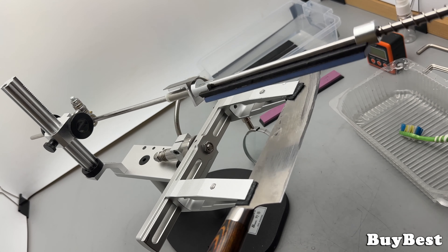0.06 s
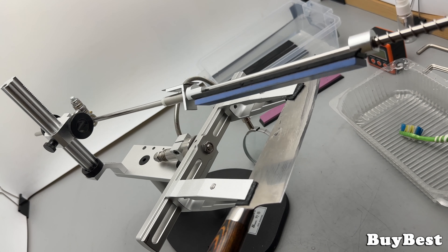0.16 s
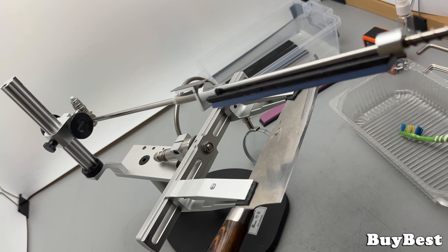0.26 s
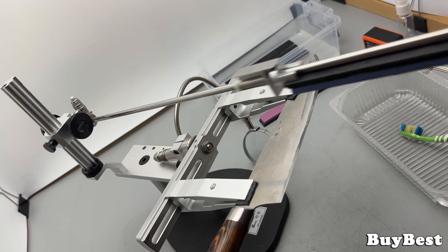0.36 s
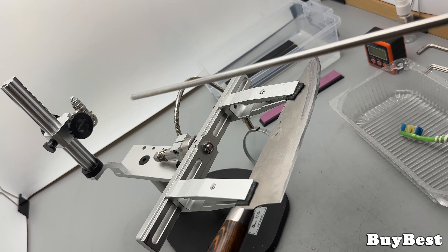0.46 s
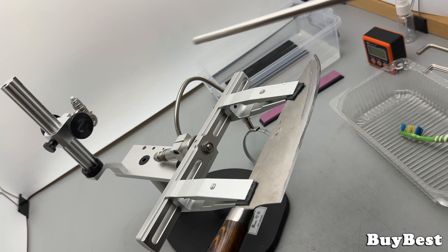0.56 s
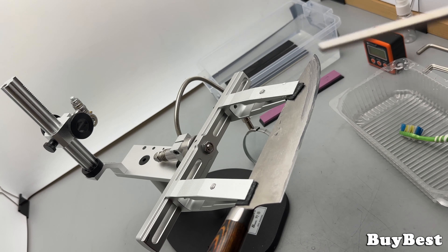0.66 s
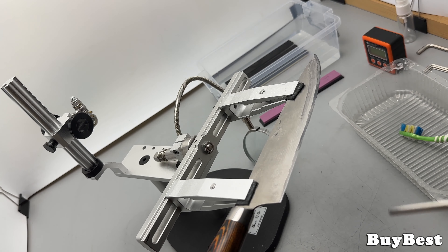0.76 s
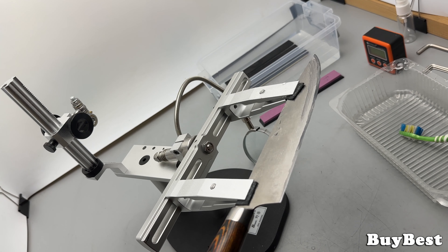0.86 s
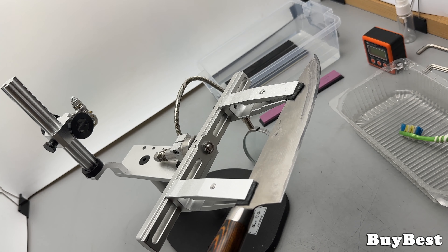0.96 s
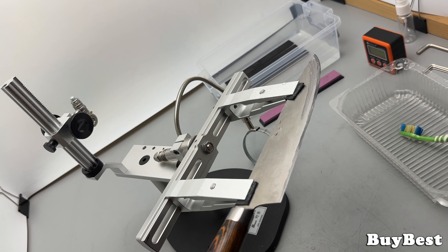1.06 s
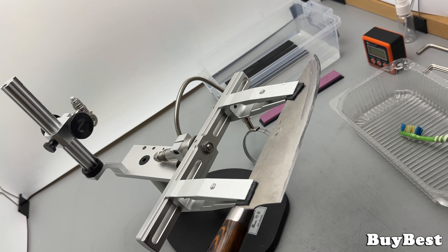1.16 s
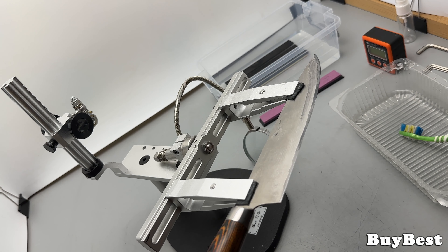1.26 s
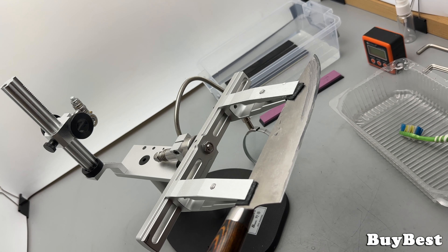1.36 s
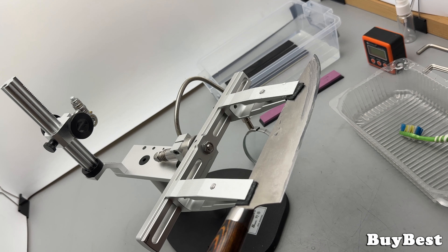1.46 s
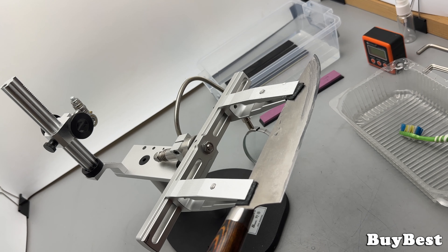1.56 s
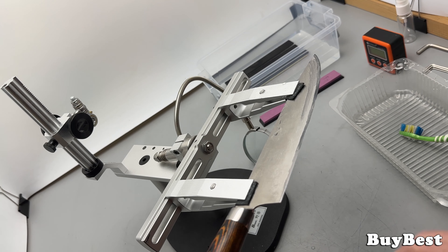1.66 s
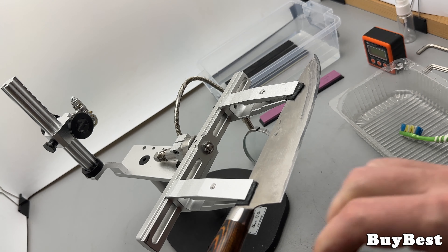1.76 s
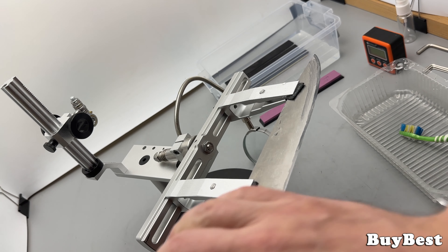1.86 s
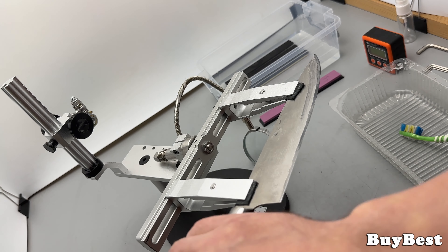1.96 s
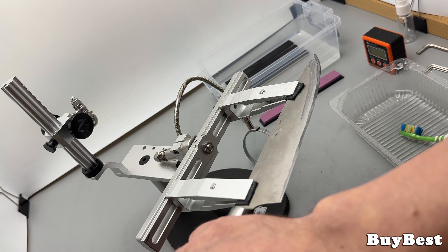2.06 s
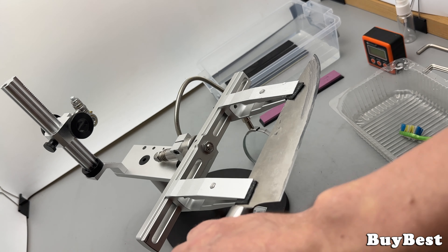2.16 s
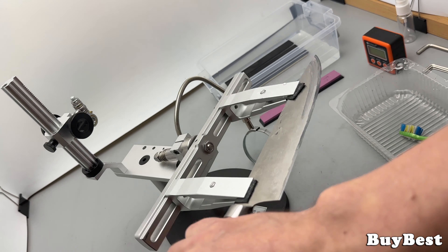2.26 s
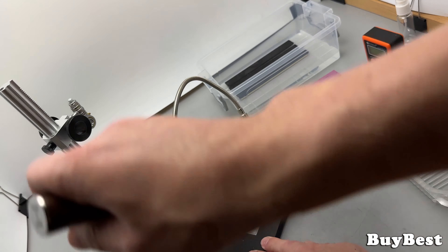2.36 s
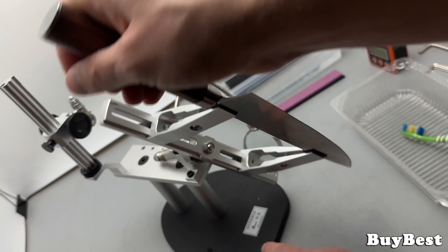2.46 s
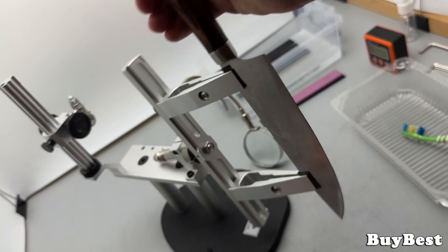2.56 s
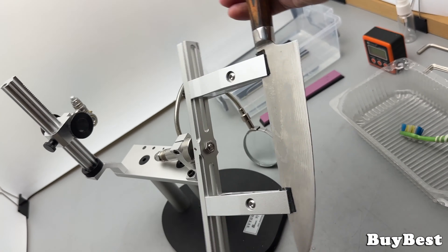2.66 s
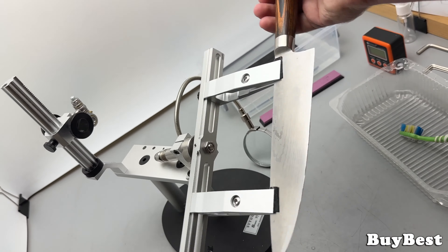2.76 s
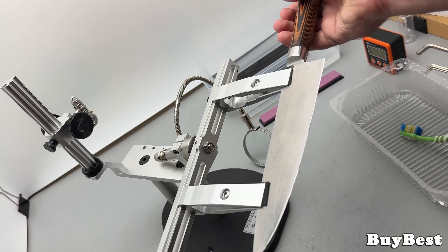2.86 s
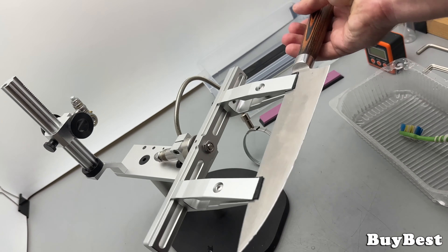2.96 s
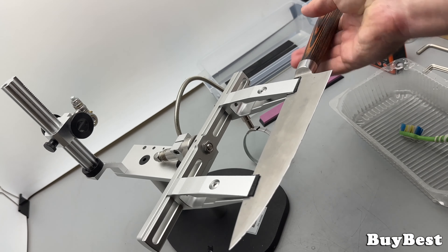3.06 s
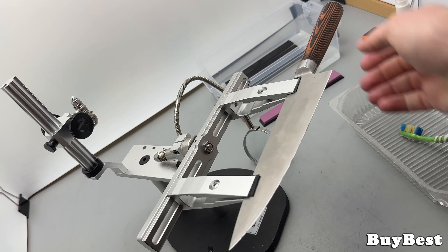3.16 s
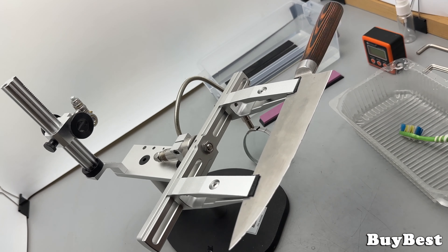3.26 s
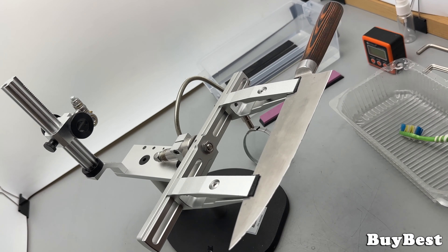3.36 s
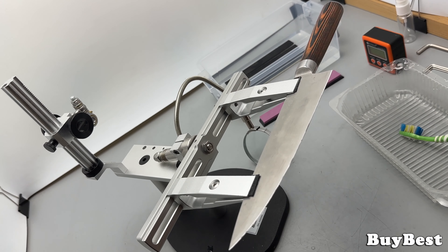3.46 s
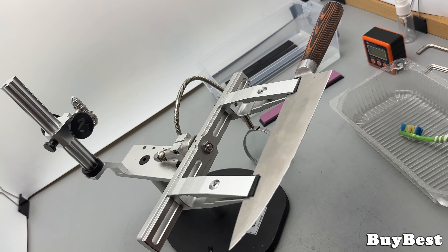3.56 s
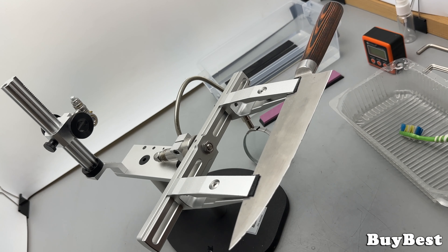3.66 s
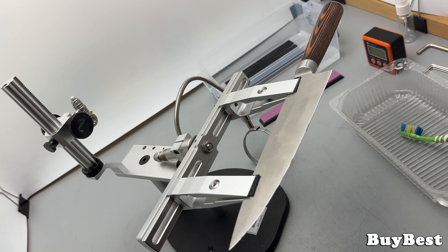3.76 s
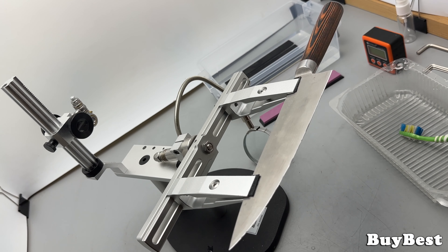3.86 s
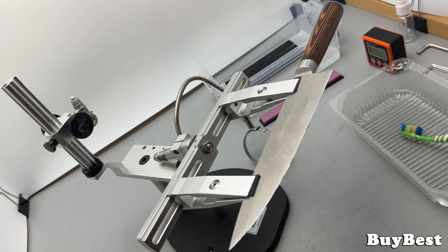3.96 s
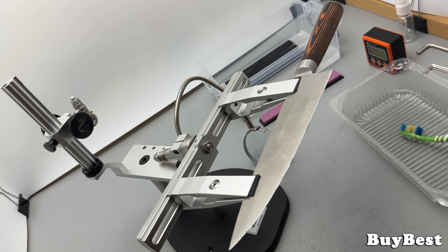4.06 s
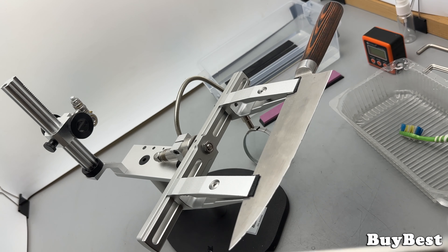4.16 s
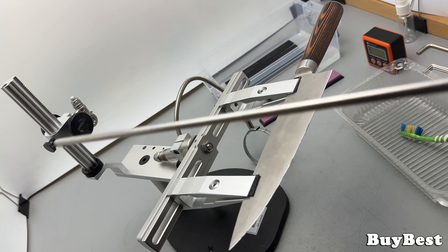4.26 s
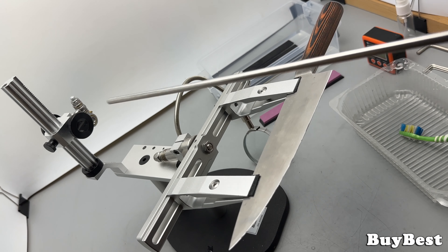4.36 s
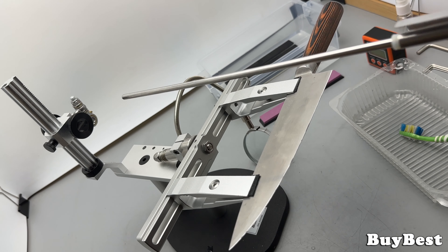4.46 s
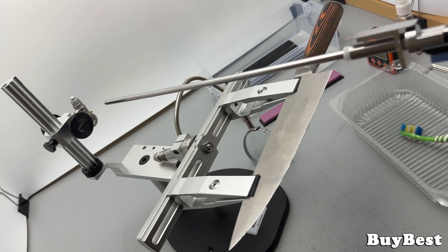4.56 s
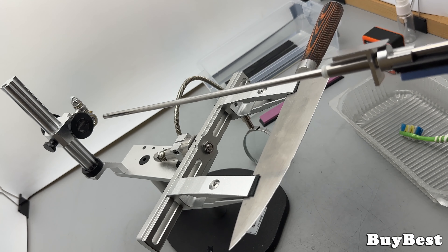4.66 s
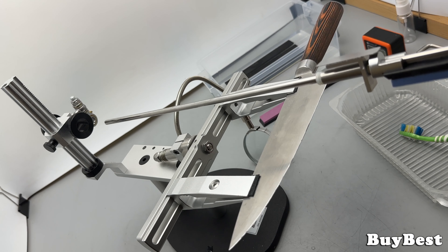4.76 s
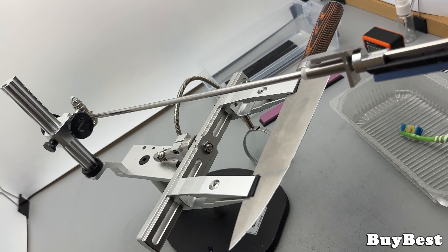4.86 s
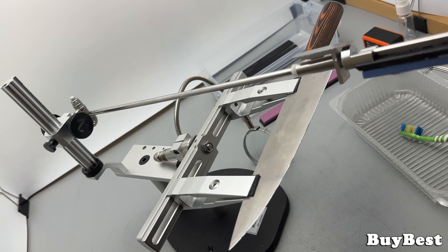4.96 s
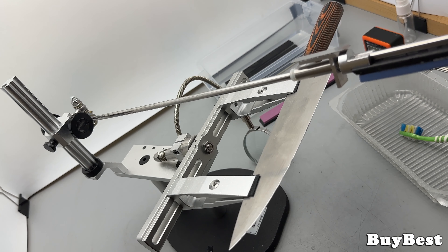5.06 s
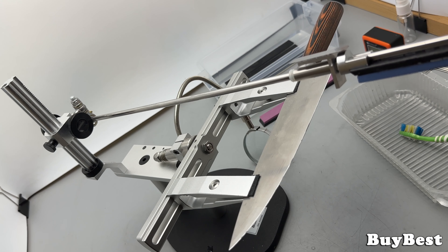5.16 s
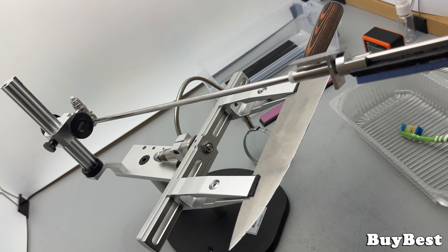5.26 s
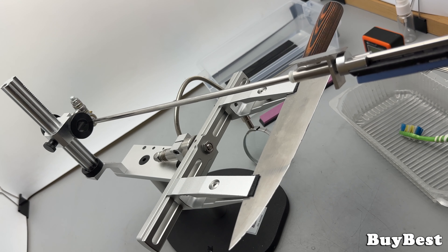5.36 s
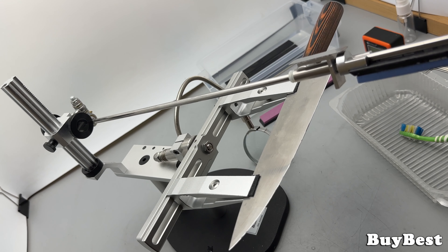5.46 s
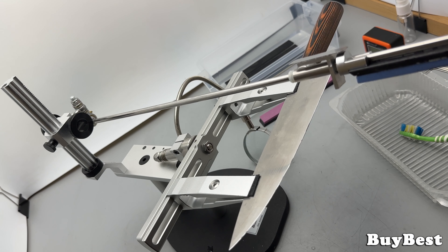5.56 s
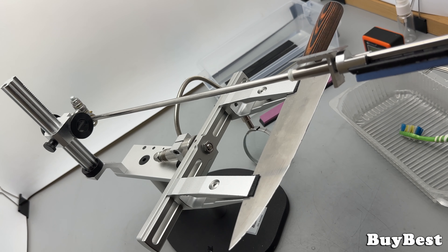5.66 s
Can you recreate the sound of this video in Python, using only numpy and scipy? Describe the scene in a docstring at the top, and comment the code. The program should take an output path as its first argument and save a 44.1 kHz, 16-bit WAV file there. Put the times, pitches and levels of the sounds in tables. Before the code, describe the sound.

In a small quiet room, metallic scrapes, a sinking gritty slide, two bursts of latch clacks with low thuds, then fine clinks and ticks.

```python
"""A steel rod rasps out of its guide in short pulls, over a faint rumble; then it slides away, slowing to a stop.
A guided knife sharpener on a workbench: a hand takes the knife, its clamp is unlatched, turned on a dry pivot
and snaps home, shaking the stand. Things rub and tick on the bench, and the rod clinks back into the guide.
Friction is roughened noise through resonances; impacts are noise bursts with decaying modes; the stand rocks
in decaying sines. A small, quiet room answers with a decaying noise tail."""
import sys
import numpy as np
from scipy import signal
from scipy.fft import rfft, irfft, next_fast_len
from scipy.io import wavfile
from scipy.ndimage import uniform_filter1d, map_coordinates

SR = 44100
rng = np.random.default_rng(int(sys.argv[2]) if len(sys.argv) > 2 else 0)


def wav_record(signal):
    """Record a signal, one row per channel, as 16-bit PCM in the file named by sys.argv[1]."""
    frames = np.transpose(np.atleast_2d(signal))
    bounded = np.clip(frames, -1, 1)
    # unit amplitude maps onto the largest positive 16-bit level
    quanta = np.round(bounded * 32767).astype(np.int16)
    wavfile.write(sys.argv[1], SR, quanta)


N = 251811  # length in samples

# Decibels in the tables are relative; each source's own gains follow. Every t60 is the time to fall by 60 dB.


def amp(db):
    """Decibels to gain: 20 dB is a factor of ten in amplitude."""
    return 10 ** (np.asarray(db) / 20)


def unit(x):
    """Scale to a root mean square of 1."""
    return x / np.sqrt(np.mean(x ** 2) + 1e-20)


def along(points, hz):
    """Interpolate (frequency, value) points on a logarithmic frequency axis."""
    f, v = np.transpose(points)
    return np.interp(np.log(hz + 1), np.log(f + 1), v)


def since(s):
    """Seconds since time s for each sample, zero before it."""
    return np.maximum(np.arange(N) / SR - s, 0)


STROKE_EDGE_S = 0.005  # a movement sets in and stops this fast


def level(rows, swell_db, ease_db):
    """Envelope of a set of movements: each sets in, swells to its peak, eases off and stops."""
    t, gain = np.arange(N) / SR, np.zeros(N)
    for s, rise, fall, db in rows:
        swelling = swell_db * (s + rise - t) / rise
        easing = ease_db * (t - s - rise) / fall
        under_peak_db = np.maximum(swelling, easing)
        to_nearest_end = np.minimum(t - s, s + rise + fall - t)
        moving = np.clip(to_nearest_end / STROKE_EDGE_S + 0.5, 0, 1)
        gain += moving * amp(db - under_peak_db)
    return gain


def wobble(rate):
    """A smooth random curve: a spline through random knots, rate of them a second."""
    knots = rng.standard_normal(int(N * rate / SR) + 4)
    return map_coordinates(knots, [np.arange(N) * rate / SR])


def filtered(x, response):
    """Linear filtering: multiply the spectrum by a response of frequency."""
    n = x.shape[-1]
    m = next_fast_len(n + SR // 10)
    return irfft(rfft(x, m) * response(np.fft.rfftfreq(m, 1 / SR)), m)[..., :n]


# Likeness of the left and right channels (1 = identical, negative = opposed).
# columns: frequency_hz, likeness
LIKENESS = [(150, 0.96), (400, 0.48), (1200, 0.12), (3200, 0.22), (6500, -0.14), (11000, 0.61)]


def channel_angle(hz):
    """Channel correlation as a phase angle in radians: its cosine is the likeness."""
    return np.arccos(np.clip(along(LIKENESS, hz), -1, 1))


def noise(colour_db, size=N):
    """Partly correlated stereo noise of rms 1, nearly mono in the bass, from a mid and a side signal."""
    def mid_and_side(hz):
        half = channel_angle(hz) / 2
        return amp(colour_db(hz)) * [np.cos(half), np.sin(half)]

    mid, side = filtered(rng.standard_normal((2, size)), mid_and_side)
    return unit(np.array([mid + side, mid - side]))


def add(track, s, sound):
    """Superposition: mix a sound in at time s."""
    part = track[:, round(s * SR):][:, :sound.shape[-1]]
    part += sound[..., :part.shape[-1]]


def ripple(hz, spacing_hz):
    """Modal density: the fixed, close peaks and dips in the response of a body of many parts."""
    return map_coordinates(rng.standard_normal(size=2048), [hz / spacing_hz], mode="wrap")


def friction(spectrum, rough_db, catch_rate, peaks=(), ring_db=0, ripple_db=2.5):
    """Sliding friction: tiny catches between two surfaces, heard through the body's resonances."""
    def body(hz):
        power = 1
        for centre, width, db in peaks:
            power = power + amp(ring_db + db) ** 2 / (1 + (2 * (hz - centre) / width) ** 2)
        return np.sqrt(power) * amp(ripple_db * ripple(hz, spacing_hz=54.88))

    catches = noise(lambda hz: along(spectrum, hz)) * amp(rough_db * wobble(catch_rate))
    return unit(filtered(catches, body))


def patchy(x, depth_db):
    """Moving excitation: as the contact travels, it stirs now one group of resonances, now another."""
    z = signal.stft(x, nperseg=512)[2]
    field = rng.standard_normal(z.shape[1:])
    field = uniform_filter1d(field, size=4, axis=0)  # smooth over frequency
    field = uniform_filter1d(field, size=9, axis=1)  # smooth over time
    return unit(signal.istft(z * amp(depth_db * unit(field)), nperseg=512)[1][:, :N])


def strikes(rows, spectrum, modes, crunch_db, ring_db):
    """Impact excitation: each contact is a short crunch that leaves the body's modes ringing at new strengths."""
    out, t = np.zeros((2, N)), np.arange(SR // 2) / SR
    for s, db, tilt_db, rise, t60 in rows:
        def tilt(hz):
            return tilt_db * np.log2(np.maximum(hz, 200) / 1000)  # constant below 200 Hz

        crunch = noise(lambda hz: along(spectrum, hz) + tilt(hz), size=len(t))
        sound = amp(crunch_db - 60 * t / t60) * crunch
        weight = np.linalg.norm([amp(mode_db + tilt(hz)) for hz, mode_db, _ in modes])
        for hz, mode_db, life in modes:
            phase = rng.uniform(0, 2 * np.pi) + np.array([[0], [channel_angle(hz)]])
            mode_level = ring_db + mode_db + tilt(hz) + rng.normal(0, 0.42)
            sound += amp(mode_level - 60 * t / life) / weight * np.sin(2 * np.pi * hz * t + phase)
        add(out, s, amp(db) * sound * (1 - np.exp(-t / rise)))
    return out


# Swells of low rumble. columns: start_s, rise_s, fall_s, level_db
RUMBLE_SWELLS = [(0.0, 0.033, 0.34, -62.5), (0.68, 0.13, 0.16, -61), (0.97, 0.5, 0.13, -60),
                 (1.5, 0.18, 0.3, -54.5), (2.3, 0.51, 0.66, -55.5), (3.5, 0.16, 0.11, -57.5),
                 (3.95, 0.26, .6, -63), (5.6, 0.09, .1, -62.5)]
# Spectra of the rumble and of the hiss. columns: frequency_hz, level_db
RUMBLE_SPECTRUM = [(12, -48), (20, -22.5), (43, -1), (65, -1.5), (119, -3), (170, -12), (204, -15),
                   (512, -29), (700, -40), (910, -70.5), (1540, -120)]
HISS_SPECTRUM = [(120, -32), (200, -6.5), (310, -17), (340, -16.5), (577, -21.5), (681, -25.5), (896, -24),
                 (981, -26.5), (2940, -30), (3590, -30.5), (15800, -44.5)]
RUMBLE_DB = -71  # the steady rumble under the swells, on their scale
SHUDDER_DB, SHUDDER_T60_S = -24.5, 0.28  # the pitchless shudder, relative to its jolt


def background():
    """Incoherent sources add in power: rumble, its swells and a shudder after each jolt, with even hiss."""
    shudder = np.zeros(N)
    for s, db, _ in JOLTS:
        after = since(s)
        shudder += amp(db + SHUDDER_DB - 60 * after / SHUDDER_T60_S) * (after > 0)
    swells = level(RUMBLE_SWELLS, swell_db=11, ease_db=14)
    gain = np.sqrt(amp(RUMBLE_DB) ** 2 + swells ** 2 + shudder ** 2)
    rumble = amp(0.5) * gain * noise(lambda hz: along(RUMBLE_SPECTRUM, hz))
    hiss = amp(-76.5) * noise(lambda hz: along(HISS_SPECTRUM, hz))
    return rumble + hiss


# Pulls that draw the rod through its guide. columns: start_s, length_s, starting_level_db
ROD_PULLS = [(0.0, 0.0071, -67), (0.025, 0.12, -85), (0.131, 0.035, -64), (0.218, 0.201, -63)]
PULL_ATTACK_S, PULL_GROWS_DB_PER_S = 0.0067, 58  # the rod gathers speed through a pull
PULL_STOP_S, GUIDE_AFTER_DB, GUIDE_T60_S = 0.049, -13, 0.22  # t60 of the stop; level and t60 of the guide's ring


def pulls():
    """Envelope of accelerated sliding: each pull grows louder, stops short and lets the guide ring on."""
    gain = np.zeros(N)
    for s, length, db in ROD_PULLS:
        t, after = since(s), since(s + length)
        stop = amp(-60 * after / PULL_STOP_S)
        guide_ring = amp(GUIDE_AFTER_DB - 60 * after / GUIDE_T60_S)
        growing = amp(db + PULL_GROWS_DB_PER_S * (t - after))
        gain += (1 - np.exp(-t / PULL_ATTACK_S)) * growing * np.maximum(stop, guide_ring)
    return gain


# The rod's tip snags as it leaves the guide. columns: start_s, rise_s, fall_s, level_db
TIP_SNAGS = [(0.418, 0.0083, 0.0067, -46.5)]
# Spectrum of steel rubbing in the guide. columns: frequency_hz, level_db
GUIDE_SPECTRUM = [(400, -6), (1200, -19), (2500, -16), (5200, -5.5), (9000, -5), (12200, -6), (15000, -4),
                  (15800, -28)]
# Resonances of the guide. columns: frequency_hz, width_hz, level_db
GUIDE_RESONANCES = [(1833, 79, 6), (3640, 390, -9.5), (5200, 41, -3), (6330, 160, -8), (10000, 120, -4),
                    (12500, 200, -1), (14680, 200, -4.5)]


def rod_in_guide():
    """Resonant friction: the pulled rod excites the guide, and its tip snags on the way out."""
    steel = friction(GUIDE_SPECTRUM, rough_db=2, catch_rate=250, peaks=GUIDE_RESONANCES, ring_db=12, ripple_db=2)
    steel = patchy(steel, depth_db=0)  # depth 0: the resonances stay even
    return amp(-0.5) * (pulls() + level(TIP_SNAGS, swell_db=13, ease_db=14)) * steel


# Skin brushing on metal. columns: start_s, rise_s, fall_s, level_db
HAND_BRUSHES = [(0.47, .14, 0.15, -77), (1.695, 0.041, 0.01, -63), (1.74, 0.076, 0.37, -78.5),
                (1.945, 0.021, 0.25, -70.5), (3.07, 0.026, 0.032, -63), (3.12, 0.056, .25, -84.5),
                (3.68, .03, 0.076, -66.5), (3.79, 0.075, 0.21, -81), (4.15, .022, 0.041, -79),
                (4.21, 0.0073, 0.038, -77.5)]
# Spectrum of skin on metal. columns: frequency_hz, level_db
SKIN_SPECTRUM = [(2000, -22), (7500, -8.5), (10500, -6), (15500, -4.5)]


def hands():
    """Soft friction: skin brushing on metal gives a bright, airy noise."""
    skin = friction(SKIN_SPECTRUM, rough_db=2.5, catch_rate=240)
    return amp(1.5) * level(HAND_BRUSHES, swell_db=11.5, ease_db=19) * skin


# Soft rubs on the bench. columns: start_s, rise_s, fall_s, level_db
BENCH_RUBS = [(0.50, 0.098, 0.076, -79.5), (1.612, 0.0073, .05, -62.5), (1.644, 0.0044, 0.17, -71),
              (3.375, 0.034, 0.046, -70), (3.452, 0.052, 0.029, -67.5), (3.654, 0.019, 0.052, -60.5),
              (3.68, 0.024, 0.018, -58), (3.835, 0.021, 0.1, -75), (5.692, 0.0091, .03, -57.5)]
# Spectrum of the rubs. columns: frequency_hz, level_db
RUB_SPECTRUM = [(150, -26.5), (250, -9.5), (585, -5), (672, -10.5), (1000, -9.5), (1550, -13),
                (5030, -24.5), (10800, -30.5), (15800, -43.5)]


def bench_rubs():
    """Dull friction: things rubbing on the bench give noise weighted to the low and middle range."""
    rub = friction(RUB_SPECTRUM, rough_db=3.0, catch_rate=200)
    return amp(1.5) * level(BENCH_RUBS, swell_db=9, ease_db=15) * rub


# Light taps on the bench. columns: start_s, level_db, brightness_db_per_octave, rise_s, t60_s
BENCH_TAPS = [(0.625, -65, 2.5, 0.0011, 0.19), (0.789, -63.5, 5, .001, 0.05),
              (1.399, -45, 4.5, 0.000099, 0.069), (1.502, -34.5, 6.5, 0.00089, 0.053),
              (1.507, -21.5, -17, 0.0018, 0.052), (1.616, -53, -8, 0.00069, 0.037),
              (3.408, -51, -5, 0.0017, 0.044), (3.526, -51, 9.5, 0.00083, 0.14),
              (3.708, -46.5, 13.5, 0.00077, 0.056)]
# Spectrum of a light tap. columns: frequency_hz, level_db
TAP_SPECTRUM = [(530, -43), (900, -21), (1260, -4), (2580, -2.5), (4600, -15.5), (6350, -22.5), (8370, -30),
                (13800, -43), (15800, -41)]


def taps():
    """Damped impact: light taps on the bench are noise bursts without ringing modes."""
    return strikes(BENCH_TAPS, TAP_SPECTRUM, [], crunch_db=-6, ring_db=0)


COAST_START_S, COAST_ATTACK_S, COAST_SLOWS_S = 1.0414, 0.0067, 0.23  # the rod coasts, ever slower
COAST_GRIT_DB, GRIT_FALL_DB = -40.5, 23.5  # grit at full speed; its loss each time the speed falls by a factor e
COAST_RUSH_DB, RUSH_FALL_DB = -44.5, 5  # the same for the hollow rush
RUSH_BUILDS_S, COAST_LENGTH_S, COAST_STOP_S = 0.033, 0.26, 0.67  # the rush builds up, lasts, and dies (t60)
EDGE_REST_HZ, EDGE_SPAN_HZ = 140, 3080  # upper edge of the rush at rest, and its rise at full speed


def coast():
    """Deceleration: the falling speed sets the gain of the grit, the gain of the rush and its upper edge in Hz."""
    t = since(COAST_START_S)
    slowing = (t / COAST_SLOWS_S) ** 2
    speed = np.exp(-slowing)
    grit = amp(COAST_GRIT_DB - GRIT_FALL_DB * slowing) * (1 - np.exp(-t / COAST_ATTACK_S))
    stopping_db = 60 * since(COAST_START_S + COAST_LENGTH_S) / COAST_STOP_S
    build_up = np.sqrt(1 - np.exp(-t / RUSH_BUILDS_S))
    rush = amp(COAST_RUSH_DB - RUSH_FALL_DB * slowing - stopping_db) * build_up
    return grit, rush, EDGE_REST_HZ + EDGE_SPAN_HZ * speed


# Shoves that start the long slide. columns: start_s, rise_s, fall_s, level_db
SLIDE_SHOVES = [(0.972, 0.0083, .03, -31.5), (0.990, .03, 0.029, -30.5), (1.048, 0.0099, 0.029, -44)]
# Spectra of the grit and of the hollow rush. columns: frequency_hz, level_db
GRIT_SPECTRUM = [(290, -72), (500, -36.5), (1210, -31.5), (1440, -13.5), (1570, -18), (1730, -13),
                 (2420, -2.5), (3730, -8.5), (4560, -9.5), (5830, -10.5), (8370, -18), (10200, -16),
                 (14100, -24.5), (15800, -30.5)]
RUSH_SPECTRUM = [(60, -22.5), (150, -8), (220, -4.5), (310, -7.5), (430, -4), (700, -2.5), (1100, -4),
                 (3000, 0)]
# Resonances of the grit, and of the bench under the slide. columns: frequency_hz, width_hz, level_db
GRIT_RESONANCES = [(2540, 1700, -1.5)]
RUSH_RESONANCES = [(239.8, 31.2, 1.5), (394, 45, 1), (610, 23, -0.5)]


def slide():
    """Speed-dependent friction: a gritty start, then a rush sinking in pitch, to the right of the stand."""
    grit_gain, rush_gain, edge_hz = coast()
    grit = friction(GRIT_SPECTRUM, rough_db=0.9, catch_rate=550,
                    peaks=GRIT_RESONANCES, ring_db=-2.5, ripple_db=2.0)
    rush = friction(RUSH_SPECTRUM, rough_db=2.5, catch_rate=170,
                    peaks=RUSH_RESONANCES, ring_db=6.5, ripple_db=1.0)
    hz, t, z = signal.stft(patchy(rush, depth_db=2.5), SR, nperseg=512)
    ratio = hz[:, None] / np.interp(t, np.arange(N) / SR, edge_hz)
    passed = 1 / np.sqrt((1 - ratio ** 3) ** 2 + 1.2 * ratio ** 3)  # a steep edge with a slight hump
    evened = passed / np.sqrt(np.mean(passed ** 2, axis=0))  # same mean power gain wherever the edge lies
    hollow_rush = signal.istft(z * evened, SR, nperseg=512)[1][:, :N]
    grit_gain = level(SLIDE_SHOVES, swell_db=11, ease_db=12.5) + grit_gain
    return (grit_gain * patchy(grit, depth_db=1.5) + rush_gain * hollow_rush) * amp([[-1], [1]])


# Knocks on the bench top. columns: start_s, level_db, brightness_db_per_octave, rise_s, t60_s
BENCH_KNOCKS = [(1.510, -21.5, 3, 0.0037, 0.13), (1.646, -44, -4.5, 0.00075, 0.2),
                (2.326, -32.5, 2, 0.0064, 0.08), (2.429, -21, -5.5, 0.00059, 0.076),
                (2.797, -44.5, -10, 0.0016, 0.087), (2.868, -32, -26, 0.0035, 0.024),
                (2.978, -38, -4, 0.0028, 0.064), (3.026, -33.5, 2, 0.0019, 0.17),
                (3.51, -44.5, -2.5, 0.0018, 0.19), (3.527, -44, -3, 0.0022, 0.2)]
# Spectrum of the knock's crunch. columns: frequency_hz, level_db
BENCH_SPECTRUM = [(71, -9), (120, 3.5), (301, -6.5), (443, 1.5), (501, -9.5), (695, -7), (785, -19.5),
                  (888, -12.5), (1510, -33.5), (2320, -31), (3490, -43.5), (10300, -56.5), (15800, -61)]
# Ringing modes of the bench top. columns: frequency_hz, level_db, t60_s
BENCH_TOP_MODES = [(111.6, -15, 0.27), (419, 3, 0.17), (520, -12.5, 0.23), (605, -0.5, 0.17),
                   (654, -30, 0.19), (974, -28, 0.11), (2290, -21, 0.2), (2600, -42.5, 0.19),
                   (2800, -42, 0.085)]


def knocks():
    """Plate impact: knocks on the bench top set its modes ringing, the low ones most."""
    return strikes(BENCH_KNOCKS, BENCH_SPECTRUM, BENCH_TOP_MODES, crunch_db=-4, ring_db=-16.5)


# Jolts that rock the stand. columns: start_s, level_db, pitch_hz
JOLTS = [(1.524, -43, 92), (2.133, -44.5, 111.3), (2.312, -37, 78.5), (2.33, -26.5, 89.4),
         (2.425, -24, 198), (2.436, -10.5, 94.4), (2.461, -49, 117), (2.98, -35.5, 105),
         (3.027, -20.5, 119), (3.528, -41.5, 112), (4.996, -36, 117.3), (5.038, -45, 113.3),
         (5.251, -46.5, 102)]
# Modes of the stand's shivering arms. columns: frequency_hz, level_db, t60_s
STAND_MODES = [(46.44, -29, 0.92), (78.7, -21, 0.52), (105.9, -17, 0.34), (126.9, -12.5, 0.24),
               (198.6, -24, 0.19), (257, -26.5, 0.21), (352, -34.5, 0.23), (429.4, -45, 0.25),
               (613, -59, 0.23)]
ROCK_T60_S, ROCK_HALVES_DB = 0.043, 31.5  # t60 after a jolt of 0 dB; a jolt this much harder dies twice as fast


def stand():
    """Damped oscillation: a jolt rocks the stand for a few cycles, and its arms shiver on."""
    out, t = np.zeros((2, N)), np.arange(SR) / SR
    for s, db, hz in JOLTS:
        t60 = ROCK_T60_S * 2 ** (-db / ROCK_HALVES_DB)
        rock = amp(6.0 - 60 * t / t60) * np.sin(2 * np.pi * hz * t)
        rock *= 1 - np.exp(-(t / 0.0074) ** 2)
        shiver = np.zeros(len(t))
        for f, mode_db, life in STAND_MODES:
            mode_level = mode_db + rng.normal(0, 1.2)
            shiver += amp(mode_level - 60 * t / life) * np.sin(2 * np.pi * f * t)
        add(out, s, amp(db) * (rock + shiver * (1 - np.exp(-t / 0.0023))))
    return out


# Faint squeaks. columns: start_s, length_s, level_db, pitch_hz
FAINT_SQUEAKS = [(1.568, 0.056, -79, 7450), (1.75, 0.1, -78, 7500)]


def squeaks():
    """Stick and slip: a brief, thin, unsteady whistle that sags in pitch."""
    out = np.zeros((2, N))
    for s, length, db, hz in FAINT_SQUEAKS:
        u = np.arange(round(length * SR)) / (length * SR)  # 0 to 1 through the squeak
        pitch = hz * (1 + 0.02 * (0.5 - u) + 0.04 * wobble(820)[:len(u)])
        whistle = np.sin(2 * np.pi * np.cumsum(pitch) / SR)
        add(out, s, amp(db) * np.sin(np.pi * u) * whistle)
    return out


# The knife, touched by the hand. columns: start_s, level_db, brightness_db_per_octave, rise_s, t60_s
KNIFE_TOUCHES = [(2.130, -43, 8.5, 0.0013, 0.12)]
# Ringing modes of the blade. columns: frequency_hz, level_db, t60_s
KNIFE_MODES = [(1144, -9, 0.13), (1387, -7, 0.13), (1678, -3.5, 0.13), (1774, -5, 0.13), (3080, -24, 0.13),
               (5040, -23, 0.084)]


def knife():
    """Blade vibration: a touch, with the crunch of a light tap, sets the blade's modes ringing."""
    return strikes(KNIFE_TOUCHES, TAP_SPECTRUM, KNIFE_MODES, crunch_db=-17.5, ring_db=-8.5)


# Clacks of the clamp's latch. columns: start_s, level_db, brightness_db_per_octave, rise_s, t60_s
LATCH_CLACKS = [(2.304, -45.5, -3.5, 0.0046, 0.16), (2.320, -26, -3.5, 0.0034, 0.058),
                (2.427, -29, -1.5, 0.0036, 0.13), (2.442, -29.5, 0, 0.0011, 0.091),
                (2.459, -26.5, 6.5, 0.0017, 0.074), (2.474, -40, 3, 0.002, 0.086),
                (2.976, -56, -3.5, 0.0013, 0.27), (3.014, -43.5, 2, 0.0047, 0.17),
                (3.023, -15.5, 0, 0.0095, 0.063), (3.035, -29.5, -2, 0.0016, 0.073)]
# Spectrum of the clamp's crunch. columns: frequency_hz, level_db
CLAMP_SPECTRUM = [(290, -45), (500, -20.5), (630, -4.5), (1000, -16), (1860, -5), (2250, -17), (2380, -8),
                  (3780, -12), (3950, -17), (5120, -11.5), (8740, -15.5), (12500, -13), (15800, -19.5)]
# Ringing modes of the clamp. columns: frequency_hz, level_db, t60_s
CLAMP_BODY_MODES = [(1825, -1.5, 0.089), (1911, -1, 0.08), (2821, -17, 0.14), (3760, -5, 0.12),
                    (5010, -15, .1), (5620, -9, .07), (6380, -9, 0.082), (10350, -15.5, .08),
                    (12000, -12.5, .06), (12930, -5, .06)]


def latch():
    """Metal impact: the latch lets go, and later snaps home, in clusters of clacks that ring the clamp."""
    return strikes(LATCH_CLACKS, CLAMP_SPECTRUM, CLAMP_BODY_MODES, crunch_db=-9, ring_db=-12.5)


# Turns of the clamp on its pivot. columns: start_s, rise_s, fall_s, level_db
CLAMP_TURNS = [(2.335, .04, 0.15, -61.5), (2.45, 0.23, 0.21, -56)]
# Spectrum of the dry pivot. columns: frequency_hz, level_db
PIVOT_SPECTRUM = [(250, -5), (400, -5.5), (800, -16), (1170, -26), (1840, -13.5), (2300, -21.5),
                  (3550, -18), (5500, -25), (8300, -24), (15800, -25.5)]
# Resonances of the pivot. columns: frequency_hz, width_hz, level_db
PIVOT_RESONANCES = [(1400, 110, 0), (1860, 56, 4), (3440, 25, 5), (4520, 65, 0.5), (4950, 72, 1),
                    (6170, 77, 8), (6445, 87, 11), (7020, 77, -1), (10060, 120, -1), (12650, 160, -8)]


def pivot():
    """Dry friction: the turning clamp scrapes on its axle and stirs shifting resonances."""
    axle = friction(PIVOT_SPECTRUM, rough_db=2.5, catch_rate=150,
                    peaks=PIVOT_RESONANCES, ring_db=8, ripple_db=3.5)
    return amp(1.0) * level(CLAMP_TURNS, swell_db=11, ease_db=20.5) * patchy(axle, depth_db=2.5)


# Fine ticks of the guide's joint. columns: start_s, level_db, brightness_db_per_octave, rise_s, t60_s
JOINT_TICKS = [(4.049, -57, -2, 0.00091, 0.034), (4.099, -59, -4, 0.00037, 0.014),
               (5.136, -37.5, -1.5, 0.00022, 0.023)]
# Spectrum of a tick's crunch. columns: frequency_hz, level_db
JOINT_SPECTRUM = [(590, -50.5), (1000, -34), (2790, -23), (3290, -16), (4810, -18), (7720, -8), (8970, -19),
                  (9730, -1), (15100, -25), (15800, -15)]
# Ringing modes of the joint. columns: frequency_hz, level_db, t60_s
JOINT_BODY_MODES = [(3170, -13.5, .05), (6160, -3.5, 0.05), (7820, -7, 0.08), (10100, 1, 0.077),
                    (12150, -1, .07), (14740, 4, 0.05)]


def joint():
    """Small-body impact: the guide's joint ticks with short, high modes."""
    return strikes(JOINT_TICKS, JOINT_SPECTRUM, JOINT_BODY_MODES, crunch_db=-7.5, ring_db=-13)


# Clinks of the rod. columns: start_s, level_db, brightness_db_per_octave, rise_s, t60_s
ROD_CLINKS = [(4.976, -51, 0, 0.0046, .1), (4.984, -31, 2.5, 0.00028, 0.058),
              (4.998, -44, -6, 0.00094, 0.11), (5.697, -46, 5, 0.0015, 0.091)]
# Spectrum of a clink's crunch. columns: frequency_hz, level_db
ROD_SPECTRUM = [(240, -22), (400, -6.5), (579, -21), (812, -8), (976, -18), (1100, -27), (1270, -10),
                (2310, -7.5), (2650, -15), (3720, -3), (4020, -13.5), (12400, -22), (15800, -38)]
# Ringing modes of the rod. columns: frequency_hz, level_db, t60_s
ROD_BODY_MODES = [(1117, -12, 0.1), (2350, -5, 0.056), (3276, -6, 0.065), (3680, 4.5, 0.1),
                  (6350, -9, 0.071), (10100, -4, 0.053), (11600, -22, 0.064), (13160, -11, 0.071)]


def clinks():
    """Bar vibration: the rod clinks back into the guide and rings in its own modes."""
    return strikes(ROD_CLINKS, ROD_SPECTRUM, ROD_BODY_MODES, crunch_db=-8.5, ring_db=-7.5)


# Reverberation time of the room. columns: frequency_hz, t60_s
ROOM_T60 = [(100, 0.81), (500, 0.27), (3000, .26), (14000, 0.11)]


def room(x):
    """Reverberation: the walls answer with a diffuse tail, the treble dying first."""
    hz, t, z = signal.stft(rng.standard_normal((2, SR // 2)), SR, nperseg=256)
    decay = amp(-60 * t / along(ROOM_T60, hz)[:, None])
    tail = signal.istft(z * decay, SR, nperseg=256)[1]
    tail = tail * (1 - np.exp(-np.arange(tail.shape[1]) / SR / 0.0063))  # the answer builds up
    return signal.fftconvolve(x, tail / np.linalg.norm(tail[0]), axes=1)[:, :N]


# Level of the left channel over the right. columns: frequency_hz, difference_db
LEFT_OVER_RIGHT = [(100, 1.5), (250, -0.5), (500, 2), (2000, 3.5), (6000, 6.5), (11000, 0)]


def scene():
    """Level-difference stereo: all sources add up, placed a little left of the microphones."""
    hits = latch() + knife() + clinks() + joint() + taps() + knocks()
    rubbing = None
    scrapes = slide() + (rod_in_guide() + pivot() + bench_rubs() + hands()) + squeaks()
    echoes = room(amp(-20.0) * hits + amp(-16) * scrapes)
    mix = hits + scrapes + echoes + stand() + background()
    return filtered(mix, lambda hz: amp(along(LEFT_OVER_RIGHT, hz) * np.array([[0.5], [-0.5]])))


TOP_HZ = 15900  # middle of the 400 Hz wide upper band edge


def record(dry):
    """Band limiting: the recorder keeps nothing above its upper band edge."""
    return filtered(dry, lambda hz: np.clip((TOP_HZ - hz) / 400 + 0.5, 0, 1))


dry = scene()
out = record(dry)
wav_record(out)
```